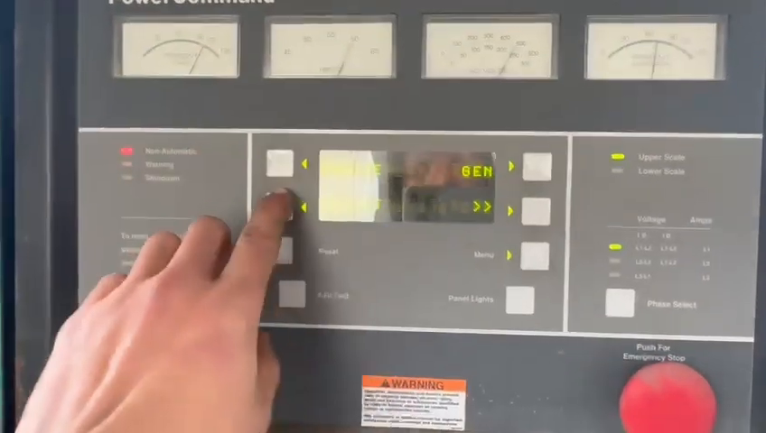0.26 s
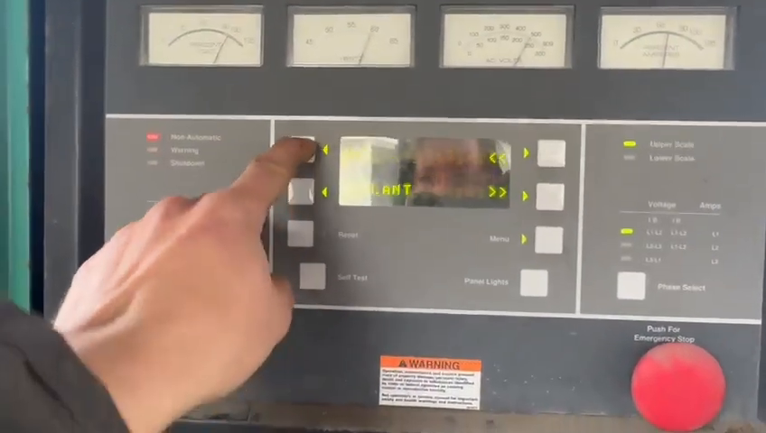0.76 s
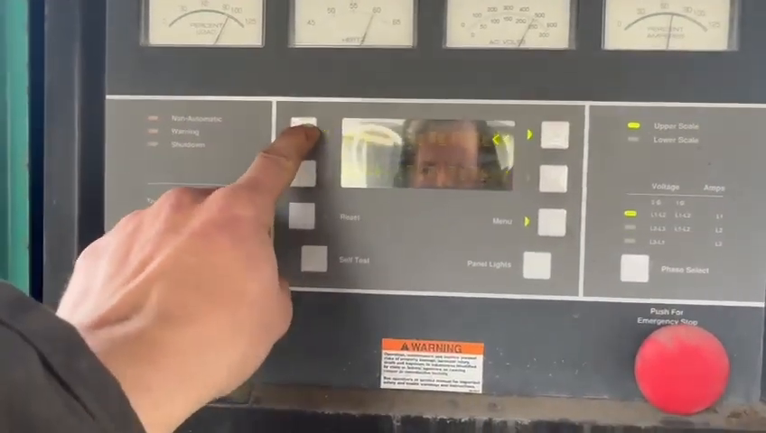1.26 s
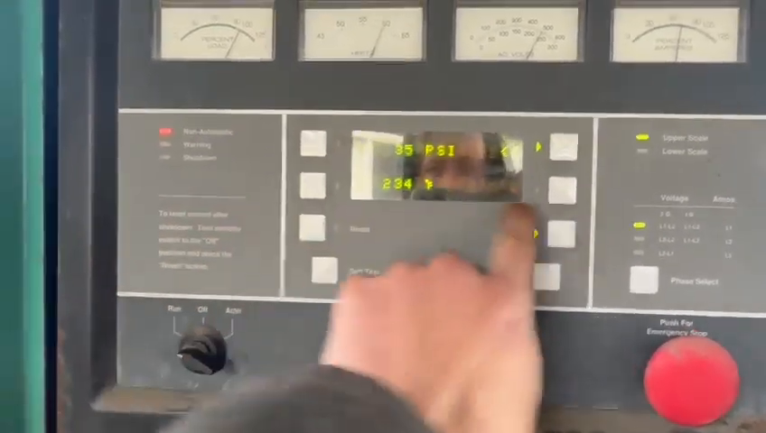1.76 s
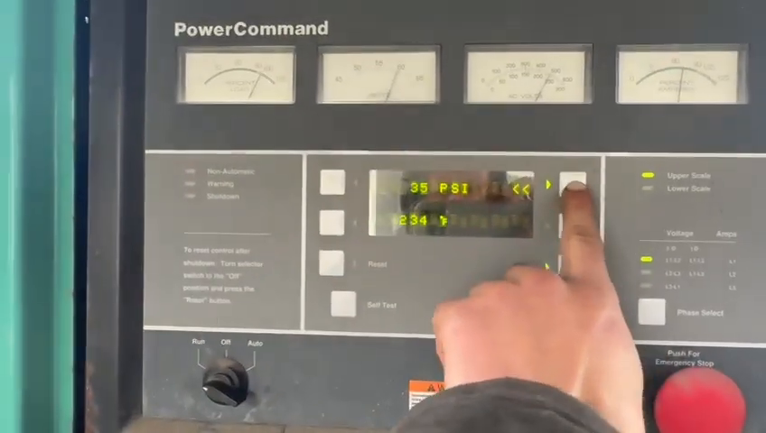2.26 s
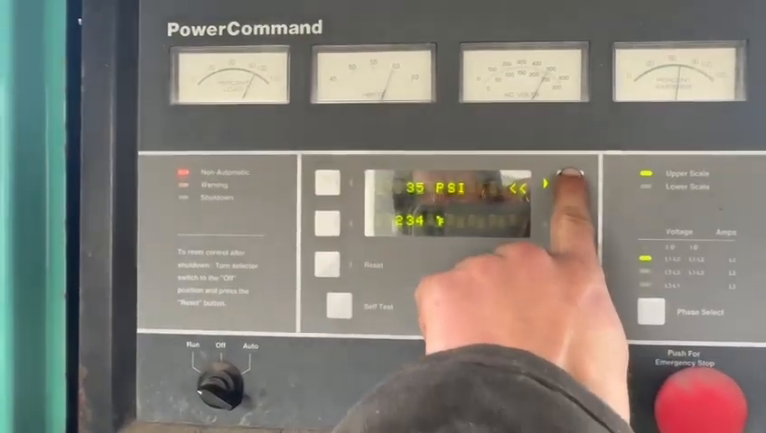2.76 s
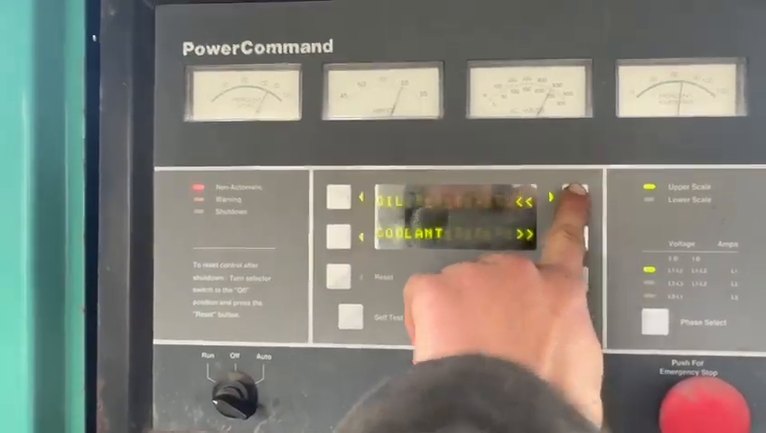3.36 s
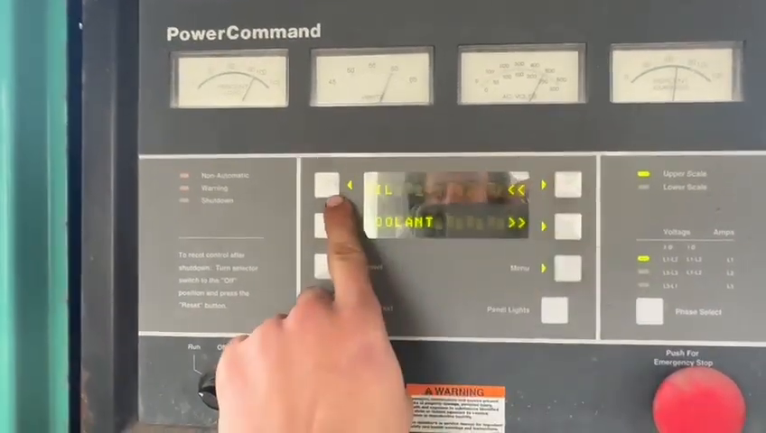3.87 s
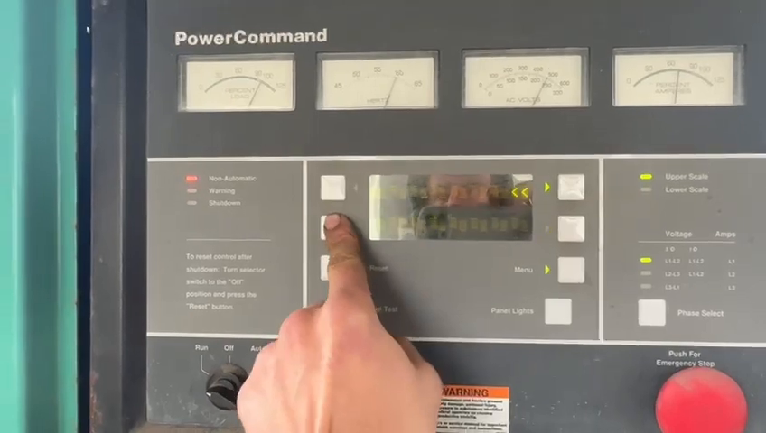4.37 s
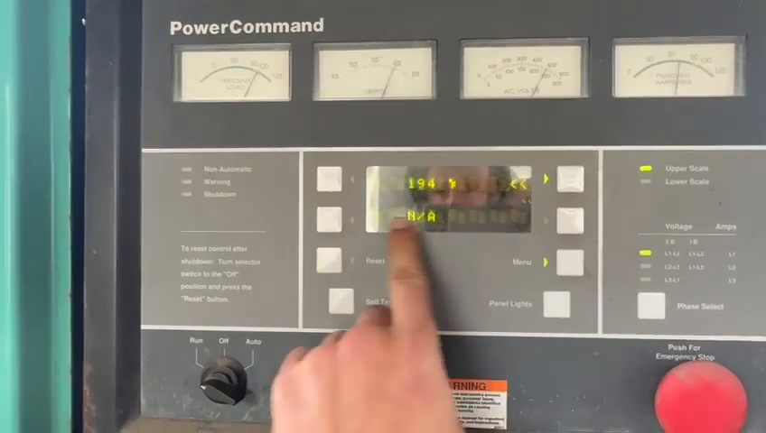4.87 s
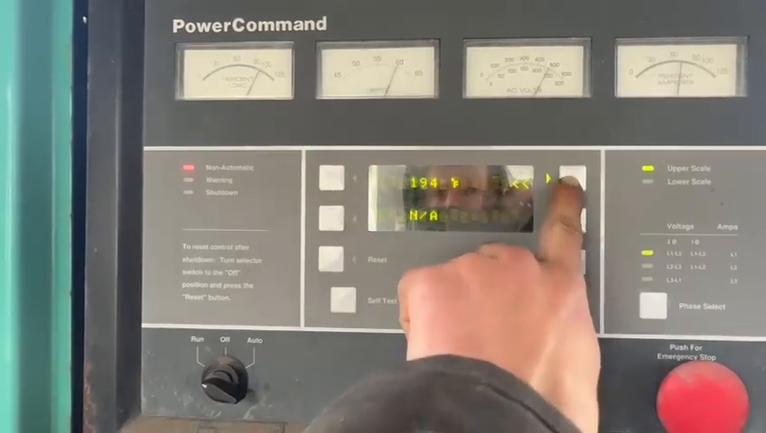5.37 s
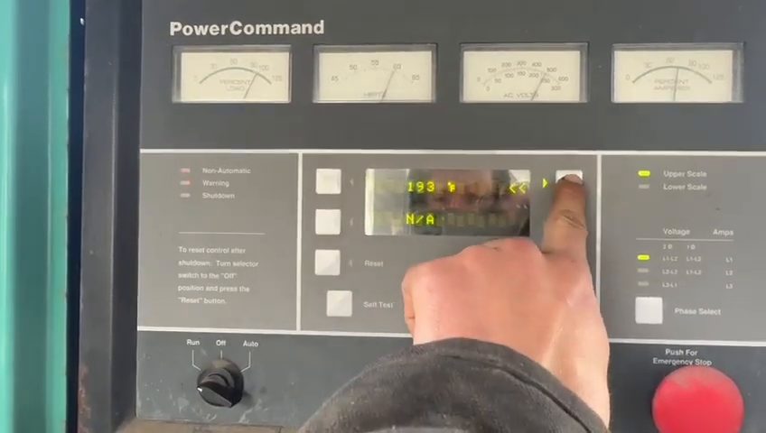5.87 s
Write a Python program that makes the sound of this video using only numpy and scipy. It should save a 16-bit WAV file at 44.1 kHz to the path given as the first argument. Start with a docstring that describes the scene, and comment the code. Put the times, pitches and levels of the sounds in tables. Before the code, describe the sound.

Continuous loud engine drone from a large diesel, close and enclosed by resonant steel. Rapid even firing makes the housing throb, with a dense buzz, gear rattle, valve ticks and occasional harder metallic knocks on top. Cooling air roars steadily, slightly fuller at first. A faint turbocharger whistle wavers very high up. No start, stop or speed change; button presses are not heard.

```python
"""A large four-stroke diesel generator at a steady 1800 rpm in a steel enclosure, heard at its control panel.
Fifteen times a second a strong firing makes the housing boom: lines locked to the crank, plus uneven shaking.
Right after it comes a spray of metallic clatter, ticks and ringing steel: shaped noise, and pings on hard knocks.
Shaped noise makes the cooling air underneath, fullest at the start, with a comb of gear and valve rattle in it.
On top sits a thin, wavering turbocharger whistle, a narrow resonance of noise, with a level ride."""
import sys
import numpy as np
from scipy import signal
from scipy.fft import rfft, irfft
from scipy.io import wavfile

SR = 44100
rng = np.random.default_rng(int(sys.argv[2]) if len(sys.argv) > 2 else 0)


def master(y):
    """Save y as 16-bit WAV."""
    cut = np.clip(np.atleast_2d(y).T, -1, 1)
    pcm = np.round(cut * 32767)  # scale
    wavfile.write(sys.argv[1], SR, pcm.astype(np.int16))


N = 270333
TIME = np.arange(N) / SR
BINS = np.maximum(np.arange(N // 2 + 1) * SR / N, 1)   # spectrum frequencies [Hz]

CYCLE_HZ = 15.0042   # engine cycles: two shaft turns each
STRONG_FIRING_S = 0.052   # the crank's zero position falls here

# relation of left and right: (frequency [Hz], coherence [0-1], phase lead of the left [rad])
STEREO_LIKENESS = [(25, 0, .2), (60, 0.4, 0.41), (288, 0.91, 0.35), (367, 0, 0.098), (450, 1, 1.2),
                   (510, 1, 3.68), (650, 0, 4.45), (820, 0, 4.65), (1392, 0.08, 5.1), (1542, 0.93, 3.1),
                   (1678, 0.65, 2.46), (1933, 0, 6.7), (2430, 0.11, 6.75), (6500, 0, 6.45)]
# narrow dips in the colour of the noise: (frequency [Hz], half width [Hz], depth [dB])
NOISE_DIPS = [(1590, 37, 0), (1755, 17, -12), (2240, 40, -4.5), (2635, 55, -4.5)]
# fan and air rush, before gusts: (frequency [Hz], left [dB per Hz], right [dB per Hz])
AIR_COLOUR = [(20, -61.5, -67), (55.3, -55, -63), (146, -48, -58.5), (238, -54.5, -60.5), (360, -60, -62.5),
              (506, -58, -68), (670, -61, -69), (1100, -66.5, -66.5), (1670, -66.5, -65.5),
              (3080, -70.5, -76.5), (4560, -71, -79.5), (6240, -73.5, -76), (7860, -81.5, -95.5),
              (10800, -82, -61.5)]
# level ride of the air rush and rattle: (time [s], level [dB])
RUSH_LEVEL = [(0, 1), (1.6, 0.62), (1.85, -0.9), (2.3, -0.2), (2.55, 0), (3.3, -1.5), (4.4, -0.2),
              (5.2, -1.1), (6.13, -1)]
# level ride of the whistle: (time [s], level [dB])
WHISTLE_LEVEL = [(0, -1), (0.9, -1), (1.5, -10.5), (2.3, 7), (3.3, -16), (3.7, 11), (4.3, 9.5), (5.0, -1.5),
                 (5.45, 12.5), (6.13, -18)]
# gear and valve rattle, each line before scatter: (frequency [Hz], left [dB], right [dB])
RATTLE_LINES = [(646, -62, -64.5), (920, -59, -57), (1340, -56.5, -63.5), (1750, -64, -63),
                (1820, -74.5, -61), (2090, -68.5, -70.5), (2710, -76, -73.5)]
# combustion clatter at a force of 1: (frequency [Hz], left [dB per Hz], right [dB per Hz])
CLATTER_COLOUR = [(497, -62.5, -66), (1480, -79, -77), (2540, -77, -71), (3280, -74.5, -87.5),
                  (4200, -74.5, -72), (5900, -71.5, -90.5), (7650, -77, -76), (7970, -77, -82),
                  (11000, -86, -75)]
# valve gear ticks in every cycle: (time after the strong firing [s], force [dB])
VALVE_TICKS = [(0.003, -3.5), (0.007, -10.5), (0.0098, 3), (0.017, -10), (0.045, -6)]
# the hardest knocks: (time [s], clatter force [dB], ping level [dB])
HARD_KNOCKS = [(0.189, 1, -32.5), (0.321, -3, -29), (0.389, -12, -37), (0.654, 1, -36), (0.719, -1, -36),
               (0.790, -20, -34.5), (0.989, -4, -31), (1.388, 2, -36.5), (1.524, -14, -40),
               (1.655, -8, -33), (1.724, -10, -32), (1.790, -8, -31), (1.924, -6, -34), (2.189, -4, -32.5),
               (2.724, -10, -32), (2.793, -18, -30.5), (3.256, -4, -30), (3.324, -8, -32),
               (3.655, -18, -32), (3.855, -16, -29), (4.254, -8, -34), (4.321, -4, -30.5),
               (4.455, -5, -26.5), (4.589, -10, -35), (4.664, -12, -30), (4.722, -8, -35), (5.387, -4, -34),
               (5.523, -12, -35)]
# ringing steel parts of the engine: (frequency [Hz], width [Hz], left [dB], right [dB])
STEEL_PARTS = [(1863, 120, -48, -49.5), (2090, 200, -54.5, -53.5), (3150, 220, -57.5, -66.5),
               (3620, 220, -55, -62), (3955, 64, -49.5, -59), (4355, 110, -49, -53.5),
               (4690, 37, -48.5, -54)]
# housing resonances shaken by uneven combustion: (frequency [Hz], width [Hz], left [dB], right [dB])
HOUSING_MODES = [(140, 24, -46, -49), (182.3, 28, -43, -49), (290.3, 44, -31.5, -44.5),
                 (350, 78, -44.5, -51.5), (466.3, 9.2, -41.5, -55)]
# small panels, each singing on the nearest engine line: (frequency [Hz], left [dB], right [dB])
PANEL_TONES = [(525, -42.5, -50), (540, -42.5, -51), (555, -44.5, -57), (570, -48, -50), (585, -45, -52),
               (600, -42, -57), (660, -41.5, -48), (705, -50.5, -54), (720, -47.5, -60),
               (795, -45.5, -51.5), (810, -47, -50), (840, -48, -51.5), (870, -48, -46.5), (900, -51, -58),
               (945, -51, -54), (960, -49.5, -51), (1035, -52, -53), (1125, -49.5, -59), (1155, -53, -55),
               (1170, -51, -59), (1290, -54, -56), (1470, -58, -53), (1830, -54, -53)]
# enclosure resonances, narrow and wide, that lift the engine's lines:
# (frequency [Hz], width [Hz], left [dB], right [dB], arrival after the strong firing [s])
ENCLOSURE_BOOMS = [(63.6, 10.6, -32.5, -37, 0.0272), (81.8, 13.7, -31, -40, 0.02277),
                   (124.66, 11.6, -40.5, -45, 0.0522), (154.9, 27.77, -32.5, -41, 0.013),
                   (191.4, 25.7, -35.5, -40, -0.0035), (246.6, 11, -36.5, -42.5, -0.0095),
                   (271, 9.63, -29.5, -38, 0.066), (289.24, 14.9, -18.5, -28.5, 0.0234),
                   (312.6, 9.13, -28, -52.5, -0.00355), (361.55, 3.44, -36.5, -43.5, -0.016),
                   (392, 6.1, -40.5, -56.5, 0.0215), (423.8, 16.1, -39.5, -43.5, -0.0103),
                   (455.8, 11.13, -27, -41.5, 0.0154), (492.5, 10.18, -40, -68.5, 0.04786)]
# bed under all engine lines, before scatter: (frequency [Hz], left [dB], right [dB])
LINE_BED = [(45, -45.5, -52), (240, -58, -66.5), (340, -65.5, -64), (490, -55, -64.5), (620, -60.5, -60),
            (875, -55.5, -58.5), (1100, -65, -68), (1400, -59, -58)]


def from_db(db):
    """Decibels to gain."""
    return 10 ** (np.asarray(db) / 20)


def rms_one(x):
    """Scale to an rms of 1."""
    return x / np.sqrt(np.mean(x ** 2) + 1e-20)


def at_hz(rows, hz):
    """Every column of a table, read on a log-frequency axis."""
    points, *columns = np.transpose(rows)
    return np.array([np.interp(np.log(hz), np.log(points), c) for c in columns])


def over_time(rows):
    """Gain that follows a level ride."""
    return from_db(np.interp(TIME, *np.transpose(rows)))


def drift(rate_hz, size=8192):
    """Random wander with a spread of 1, its movement damped above rate_hz."""
    hz = np.arange(size // 2 + 1) * SR / N
    spectrum = rfft(rng.standard_normal(size)) / (1 + (hz / rate_hz) ** 2)
    wander = rms_one(irfft(spectrum, size))
    return np.interp(np.arange(N) * size / N, np.arange(size), wander)


def noise_ripple(ripple_db, count=220):
    """Fine colour of the noise in dB: many small random peaks and dips, and a few fixed narrow dips."""
    pitches = np.geomspace(500, 8000, count)
    ripple = np.interp(BINS, pitches, ripple_db * rng.standard_normal(count), left=0, right=0)
    dips = sum(db / (1 + ((BINS - hz) / width_hz) ** 4) for hz, width_hz, db in NOISE_DIPS)
    return ripple + dips


def stereo_noise(colour=None):
    """Noise whose left and right agree at some pitches only; white, or coloured by a table of dB per Hz."""
    one, other = rfft(rng.standard_normal((2, N)))
    alike, lead = at_hz(STEREO_LIKENESS, BINS)
    alike = np.clip(alike, 0, 1)
    right = (alike * one + np.sqrt(1 - alike ** 2) * other) * np.exp(-1j * lead)
    pair = np.array([one, right])
    if colour is not None:
        colour_db = at_hz(colour, BINS) + noise_ripple(ripple_db=3.0)
        pair = pair * from_db(colour_db) * np.sqrt(SR / 2)   # dB per Hz to full-band noise
    return irfft(pair, N)


def resonate(force, modes):
    """Drive resonances, each about 6 dB down one width off centre and set to its own left and right rms."""
    spectrum, out = rfft(force), 0
    for hz, width_hz, left_db, right_db in modes:
        detuning = (BINS / hz - hz / BINS) * hz / width_hz
        ringing = irfft(spectrum / (1 + .5j * detuning) ** 2, N)
        out = out + from_db([[left_db], [right_db]]) * rms_one(ringing)
    return out


def blows(cycles, delay_s, rise_s, decay_s, uneven_db):
    """Force of one blow per cycle: a fast rise and a slower fall, with a random strength every cycle."""
    position = cycles - delay_s * CYCLE_HZ
    number = np.floor(position).astype(int)
    age = position % 1 / CYCLE_HZ
    strength = from_db(uneven_db * rng.standard_normal(N))[number]
    return strength * (1 - np.exp(-age / rise_s)) * np.exp(-age / decay_s)


def stroke(cycles, depth, delay_s, count=1):
    """Gain that swells count times per cycle, one swell peaking delay_s after the strong firing."""
    return 1 + depth * np.cos(2 * np.pi * count * (cycles - delay_s * CYCLE_HZ))


def each_cycle(cycles, orders, level_db, phase, size=4096):
    """Lines at multiples of the cycle rate: one cycle's waveform, read at the crank's position."""
    lines = np.zeros((2, size // 2 + 1), complex)
    lines[:, orders] = from_db(level_db) * np.exp(1j * phase) * size / np.sqrt(2)
    crank = np.arange(size) / size
    return np.array([np.interp(cycles, crank, shape, period=1) for shape in irfft(lines, size)])


def panel_orders():
    """The multiple of the cycle rate that each panel sings on."""
    return np.round(np.array(PANEL_TONES)[:, 0] / CYCLE_HZ).astype(int)


def wide_top(pair, opposed_hz=7810):
    """Widen the highest hiss: around opposed_hz the right turns into the left with opposite sign."""
    left, right = rfft(pair)
    turn = np.pi / 2 * np.clip((BINS - opposed_hz) / 1400 + .5, 0, 1)
    return irfft(np.array([left, np.cos(turn) * right - np.sin(turn) * left]), N)


def air_rush(cycles):
    """Fan and air turbulence as coloured noise, roughened by the uneven strokes of the engine."""
    strokes = blows(cycles, delay_s=0.009, rise_s=0.0032, decay_s=0.054, uneven_db=2.5)
    return stereo_noise(AIR_COLOUR) * (0.84 + 0.27 * strokes)


def turbo_whistle():
    """Noise in a narrow resonance makes a wavering whistle, 2.6 rad apart in left and right."""
    mode = [(10742, 16, -58, -58)]   # Hz, width Hz, left and right dB before the level ride
    tone = signal.hilbert(resonate(rng.standard_normal(N), mode))
    return np.real(tone * np.exp(1j * np.array([[0], [2.6]])))


def rattle(cycles, scatter_db):
    """Gears and valves make the same contacts in every cycle: a dense comb of weak lines."""
    orders = np.setdiff1d(np.arange(45, 175), panel_orders())
    hz = orders * CYCLE_HZ
    level_db = at_hz(RATTLE_LINES, hz) + scatter_db * rng.uniform(-1.5, 1, (2, len(orders)))
    phase = rng.uniform(-np.pi, np.pi, len(orders))
    lead = at_hz(STEREO_LIKENESS, hz)[1] + 0.73 * rng.standard_normal(len(orders))
    comb = each_cycle(cycles, orders, level_db, np.array([phase, phase - lead]))
    return comb * stroke(cycles, depth=0.4, delay_s=.012, count=4)


def pings(decay_s=0.012, right_db=-10.5, detune=0.008, uneven_db=2.5):
    """Each hard knock pings the two highest steel parts, with a slightly random pitch and strength."""
    out = np.zeros(N)
    for knock_s, _, ping_db in HARD_KNOCKS:
        start = int(knock_s * SR)
        age = TIME[:min(N - start, SR // 10)]
        for hz, *_ in STEEL_PARTS[-2:]:
            pitch, strength = rng.standard_normal(2)
            wave = np.sin(2 * np.pi * hz * (1 + detune * pitch) * age) * np.exp(-age / decay_s)
            out[start:start + len(age)] += from_db(ping_db + uneven_db * strength) * wave / np.sqrt(2)
    return out * from_db([[0], [right_db]])   # weaker on the right


def hard_knocks(decay_s=0.021):
    """Force of the knocks harder than the rest: a sudden hit and an exponential fall."""
    force = np.zeros(N)
    for knock_s, clatter_db, _ in HARD_KNOCKS:
        start = int(knock_s * SR)
        force[start:] += from_db(clatter_db) * np.exp(-TIME[:N - start] / decay_s)
    return force


def clatter(cycles, grain_db):
    """The strong firing sprays tiny metal contacts that die away; valve ticks and ringing steel join in."""
    spray = blows(cycles, delay_s=0.0043, rise_s=0.0008, decay_s=0.046, uneven_db=0.55)
    ticks = 0
    for delay_s, tick_db in VALVE_TICKS:
        tick = blows(cycles, delay_s, rise_s=0.00072, decay_s=0.0017, uneven_db=4.5)
        ticks = ticks + from_db(tick_db) * tick
    force = np.sqrt(spray ** 2 + ticks ** 2 + hard_knocks() ** 2)
    contacts = stereo_noise(CLATTER_COLOUR) * force * from_db(grain_db * drift(250))
    # the first contacts set the steel ringing; a constant part keeps it stirring
    first_hit = blows(cycles, delay_s=0.003, rise_s=0.0014, decay_s=0.061, uneven_db=1.7)
    knock = 0.19 + first_hit + 0.87 * ticks
    return contacts + resonate(stereo_noise() * knock, STEEL_PARTS)


def rumble(cycles):
    """No two firings are equal: the uneven part of their force, as noise, shakes the housing."""
    firing = blows(cycles, delay_s=-.003, rise_s=.002, decay_s=.018, uneven_db=1.5)
    return resonate(stereo_noise() * (0.6 + firing), HOUSING_MODES)


def panels(cycles, wander, wander_hz):
    """Small panels sing tones locked to the crank; each tone slowly swells, fades and shifts in phase."""
    out = 0
    for order, (hz, left_db, right_db) in zip(panel_orders(), PANEL_TONES):
        swell = (1 + wander * drift(wander_hz)) / np.sqrt(1 + wander ** 2)
        phase = 2 * np.pi * (order * cycles + rng.random()) + wander * drift(wander_hz)
        pair = np.cos([phase, phase - at_hz(STEREO_LIKENESS, hz)[1]])
        out = out + np.sqrt(2) * from_db([[left_db], [right_db]]) * swell * pair
    return out


def enclosure(hz):
    """Left and right power that the enclosure resonances give to each pitch, and how late it arrives [s]."""
    centre, width, left_db, right_db, arrival_s = np.transpose(ENCLOSURE_BOOMS)
    share = (1 + ((hz[:, None] - centre) / width) ** 2) ** -4
    power = from_db([left_db, right_db]) ** 2
    late_s = share @ (power[0] * arrival_s) / (share @ power[0])
    return power @ share.T, late_s


def hum(cycles, waver_db, scatter_db, count=90):
    """Engine lines; the housing delays each pitch, so the low ones gather into one boom per cycle."""
    orders = np.arange(3, count)
    hz = orders * CYCLE_HZ
    # short waves bounce about the enclosure and arrive with a strength and phase of their own
    scattered = hz > 500
    even_odd_db = -0.5 * (-1.0) ** orders   # even lines sit below the bed, odd ones above
    scatter = scattered * scatter_db * rng.uniform(-0.9, 1, len(hz))
    bed_db = at_hz(LINE_BED, hz) + even_odd_db + scatter
    level_db = 10 * np.log10(from_db(bed_db) ** 2 + enclosure(hz)[0])
    # summing the delays over frequency gives the phase
    phase = -2 * np.pi * CYCLE_HZ * np.cumsum(enclosure(hz - CYCLE_HZ / 2)[1])
    phase = phase + scattered * rng.uniform(-np.pi, np.pi, len(hz))
    phase = np.array([phase, phase - at_hz(STEREO_LIKENESS, hz)[1]])
    free = ~np.isin(orders, panel_orders())   # the panels sing the other lines
    low, high = free & ~scattered, free & scattered
    boom = each_cycle(cycles, orders[low], level_db[:, low], phase[:, low])
    buzz = each_cycle(cycles, orders[high], level_db[:, high], phase[:, high])
    buzz = buzz * stroke(cycles, depth=0.091, delay_s=0.01, count=4)   # four firings a cycle
    buzz = buzz + panels(cycles, wander=0.35, wander_hz=3.6)
    buzz = buzz * stroke(cycles, depth=0.13, delay_s=0.028)
    return boom + buzz * from_db(waver_db * drift(15))   # the buzz wavers with the combustion


def scene():
    """Mix the layers; a nearly steady crank position drives every engine sound."""
    cycles = (TIME - STRONG_FIRING_S) * CYCLE_HZ + 0.0021 * drift(1.9)
    rush = air_rush(cycles) + rattle(cycles, scatter_db=2.0)
    rush = rush * from_db(0.81 * drift(8.8))   # quick flutter, spread in dB
    rush = rush * over_time(RUSH_LEVEL)
    whistle = over_time(WHISTLE_LEVEL) * turbo_whistle()
    metal = clatter(cycles, grain_db=1.2) + pings()
    low = hum(cycles, waver_db=0.5, scatter_db=4.0) + rumble(cycles)
    low = low * from_db(-0.11 * (TIME - TIME.mean()))   # eases by 0.11 dB per second
    return low + wide_top(rush + metal) + whistle


def record(dry):
    """Cut the deepest rumble below 25 Hz and the top above 11.2 kHz."""
    dry = signal.sosfilt(signal.butter(2, 25, "high", fs=SR, output="sos"), dry)
    return signal.sosfilt(signal.ellip(10, .2, 80, 11200, fs=SR, output="sos"), dry)


dry = scene()
out = record(dry)
master(out)
```